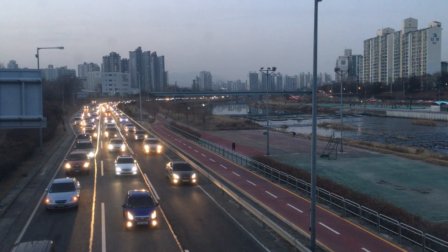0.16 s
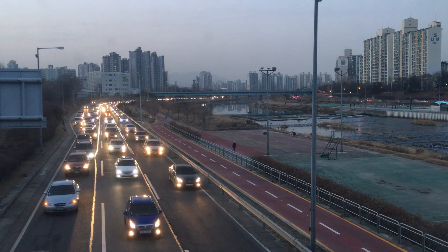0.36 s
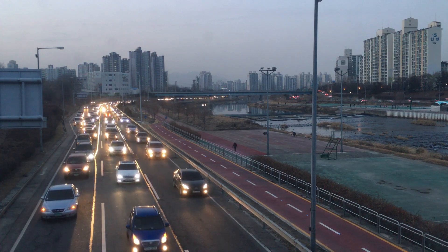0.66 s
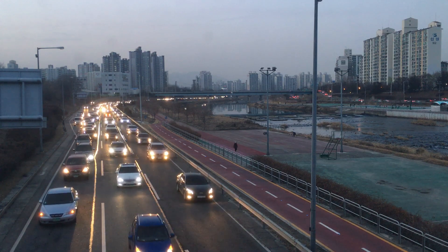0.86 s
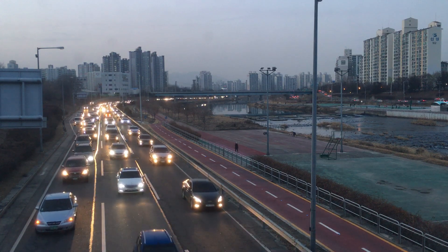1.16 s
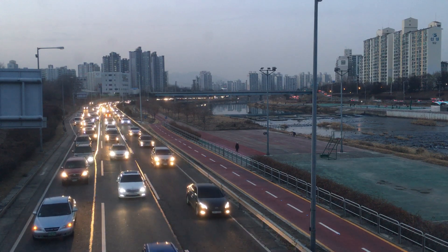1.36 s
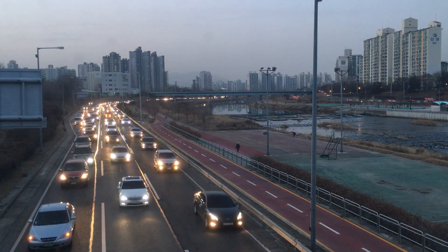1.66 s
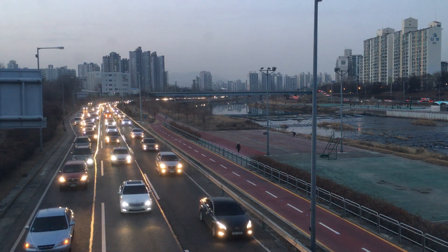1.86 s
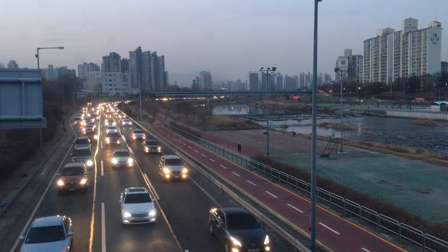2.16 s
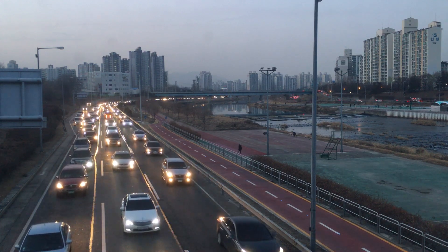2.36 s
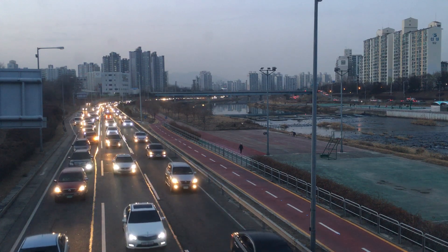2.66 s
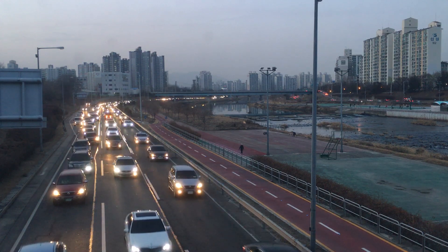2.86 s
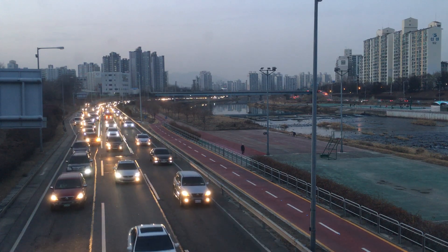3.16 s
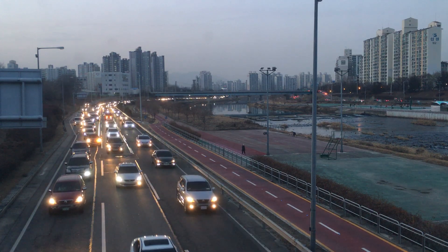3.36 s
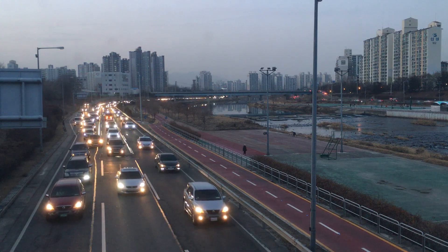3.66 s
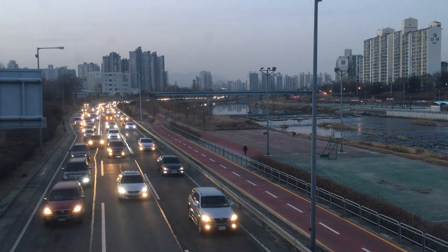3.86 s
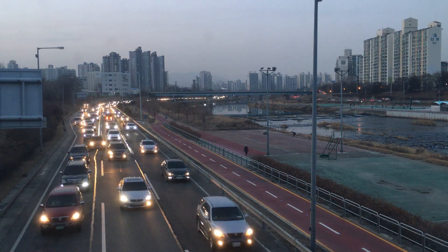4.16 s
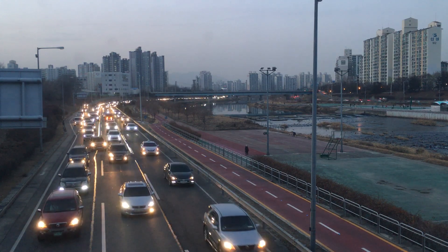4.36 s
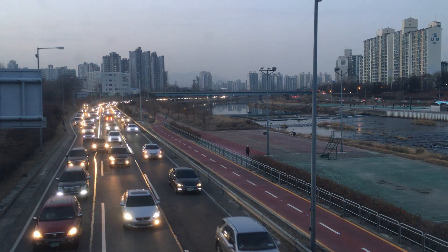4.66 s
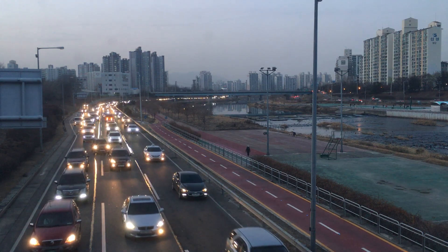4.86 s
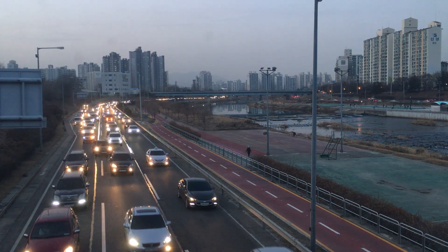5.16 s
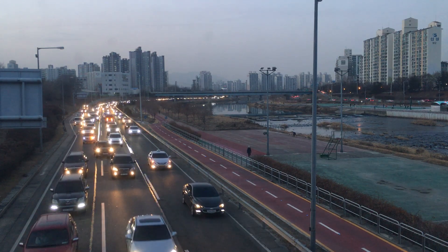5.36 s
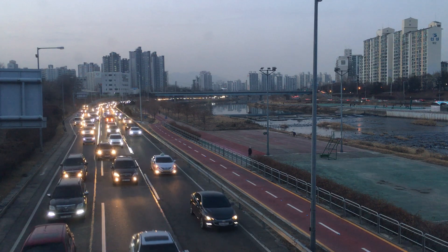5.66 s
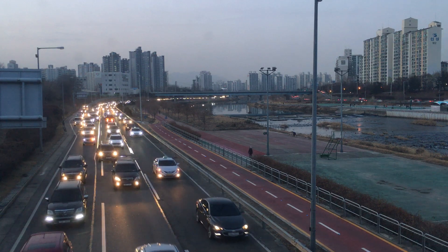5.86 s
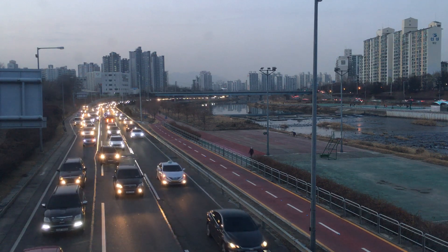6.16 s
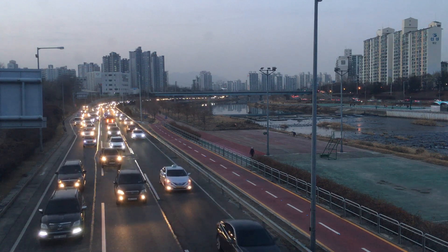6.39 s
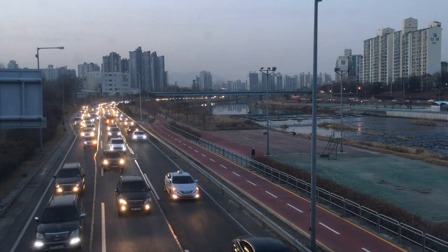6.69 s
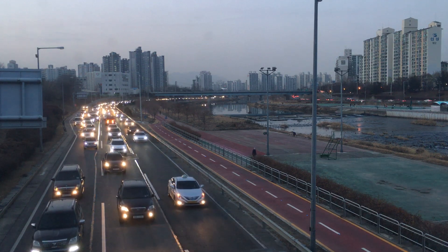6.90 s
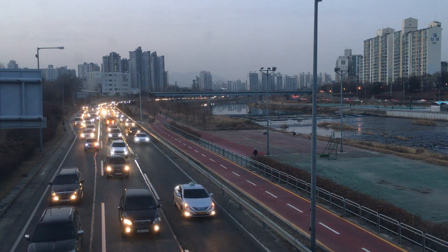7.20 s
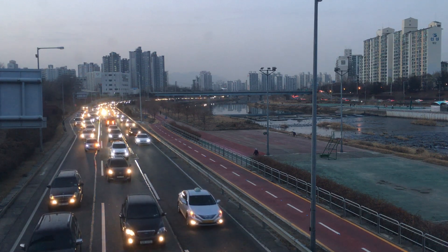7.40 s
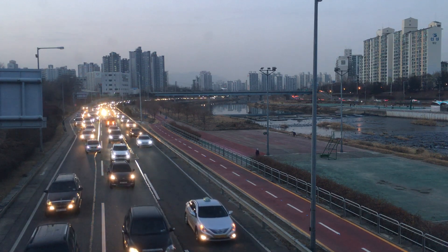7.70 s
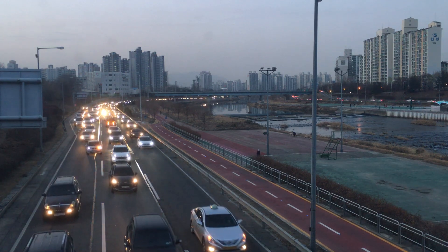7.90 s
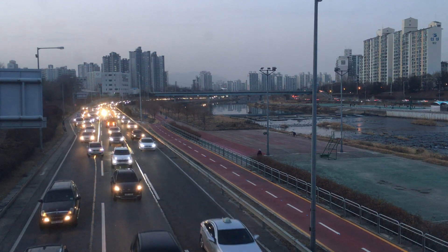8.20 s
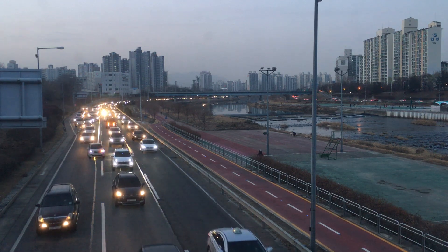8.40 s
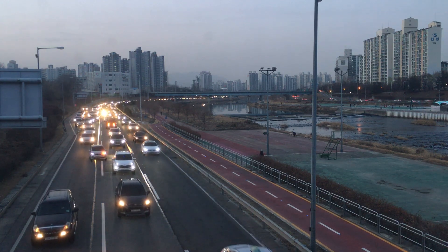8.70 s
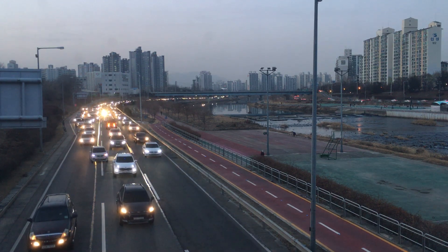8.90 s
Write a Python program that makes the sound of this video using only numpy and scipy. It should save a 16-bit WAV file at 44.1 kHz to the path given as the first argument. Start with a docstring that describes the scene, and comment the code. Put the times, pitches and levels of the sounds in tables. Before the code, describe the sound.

From 0 to about 9 seconds, dense slow traffic passes under a footbridge, heard by a small microphone above the road. A continuous deep exhaust rumble dominates, heaviest below about 120 Hz, under a softer, slightly patchy tyre roar around 1 kHz. Thin tyre hiss swells with the nearest cars and falls quickly as the deck hides them, near 0.5, 2.4, 4.5, 5.2, 5.9, 7.5 and 8.5 seconds, with another approaching at the end. Low engine tones, roughly 40 to 140 Hz, glide slightly and melt back into the rumble; a wavering hum is most noticeable around 4.5 to 5.5, and further low drones emerge from 6.5 onward. Very faint, narrow, breathy brake whistles appear around 1.7 to 2.6, 6.8 to 7.5, and 7.8 to 9.

```python
"""Dense, slow car traffic under a footbridge on a multi-lane road, heard by a small microphone:
exhausts and tyres of many cars blend into a low rumble and a roar around 1 kHz, both shaped noise.
The nearest cars add a bright hiss, noise that grows with approach until the bridge deck hides it.
Engine firing tones, gliding sines, surface and sink in the rumble.
Brakes whistle faintly as narrow bands of noise."""
import sys
import numpy as np
from scipy import signal
from scipy.fft import rfft, irfft, next_fast_len
from scipy.io import wavfile
from scipy.ndimage import uniform_filter1d

SR = 44100
rng = np.random.default_rng(int(sys.argv[2]) if len(sys.argv) > 2 else 0)


def generate_wav(signal):
    """Clip the signal to [-1, 1] and save it as 16-bit WAV at the path in sys.argv[1]."""
    frames = np.transpose(np.atleast_2d(signal))
    scaled = np.clip(frames, -1, 1) * 32767
    pcm = np.round(scaled).astype(np.int16)
    wavfile.write(sys.argv[1], SR, pcm)


N = 398663

# The stream of cars: (time [s], exhaust rumble [dB], tyre roar [dB], distant hiss brightness [dB])
STREAM_LEVELS = [(0.0, -34, -42.5, -2), (0.4, -35.5, -40.5, 1.5), (1.0, -33.5, -40.5, 1.5),
                 (1.6, -35.5, -40.5, -0.5), (2.3, -33, -40, 2), (2.8, -35.5, -39.5, -2),
                 (3.3, -32.5, -40, -6), (4.0, -32.5, -39.5, -2.5), (5.0, -32.5, -40, 0), (5.7, -32, -39, 3),
                 (6.5, -33.5, -38.5, 1), (7.3, -31.5, -39, -3), (8.0, -33.5, -39.5, -3),
                 (9.04, -34, -39.5, -1.2)]
# Exhaust noise spectrum: (frequency [Hz], relative density [dB per Hz])
RUMBLE_SPECTRUM = [(12, -30), (22, -19), (30, -3), (40, -0.5), (60, 1.5), (112, -5), (176, -5.5),
                   (290, -11.5), (370, -16.5), (500, -22.5), (780, -29.5), (1300, -78)]
# Where many engines and the hollow under the bridge pile up or thin out:
# (centre [Hz], width [Hz], lift [dB])
BOOM_MODES = [(45, 9.3, 1.5), (56, 10, 2), (71, 7.2, 0), (82.7, 15, 3), (100, 15.3, 7.5),
              (136.5, 12.4, 4.5), (234.8, 15.7, 4), (257, 17.5, -4), (284.2, 19, 4), (439, 10, 5.5)]
# Tyre roar spectrum: (frequency [Hz], relative density [dB per Hz])
ROAR_SPECTRUM = [(150, -62), (250, -8.5), (287, -11), (351, -11.5), (511, -10), (956, -4.5), (1790, -16.5),
                 (2570, -20), (3700, -32), (5000, -37), (6500, -50), (11000, -120)]
# Air pumped in tread grooves: (centre [Hz], width [Hz], lift [dB])
TREAD_MODES = [(943, 110, 1), (1320, 59, 1), (2520, 220, 1), (3200, 350, 2)]
# Tyre hiss spectrum: (frequency [Hz], relative density [dB per Hz])
HISS_SPECTRUM = [(1500, -28), (2500, -5.5), (4000, -1.5), (7000, -1.5), (10000, -6), (13000, -8),
                 (14400, -8.5)]
# The nearest cars: (time of going under the bridge [s], unshadowed hiss [dB], brightness [dB])
NEAR_CARS = [(0.55, -63, -2), (2.38, -61, 0), (4.5, -60, 1.3), (5.2, -57.5, -1.5), (5.9, -58.5, 4),
             (7.48, -59, 1.7), (8.45, -66, -1.5), (9.2, -60, 3.5)]
# One engine note that swells and sinks: (time [s], frequency [Hz], level [dB])
HUM_NOTE = [(0.25, 58.1, -39), (0.5, 60.4, -37), (0.8, 55.2, -38), (1.1, 56, -34), (1.5, 60.3, -35.5),
            (1.75, 58.8, -39), (2.2, 56, -39), (2.6, 55.2, -44), (2.9, 57.5, -34.5), (3.2, 57.5, -41),
            (3.7, 58.3, -36.5), (4.1, 60.05, -41), (4.45, 61.9, -28), (4.75, 57.9, -39), (5.0, 57.9, -31),
            (5.35, 60.5, -31), (5.65, 63, -33.5), (5.9, 63, -41)]
# The loudest engine firing tones:
# (start [s], length [s], first frequency [Hz], last frequency [Hz], peak level [dB])
LOUD_TONES = [(0.0, 0.4, 45.3, 45.2, -34), (0.147, 0.39, 102.5, 103, -37), (0.4, 0.49, 138.9, 141.2, -39.5),
              (1.609, 0.41, 51.44, 48.5, -32.5), (1.9, 0.83, 103, 105.4, -40),
              (2.369, 0.35, 45.5, 45.2, -36), (3.742, 0.51, 97.1, 99.4, -37),
              (4.172, 0.98, 101.6, 105.3, -37), (4.338, 0.56, 54.4, 51.8, -37),
              (4.949, 0.42, 51.5, 47.2, -33), (5.004, 0.43, 99.3, 96.3, -41), (5.607, 0.47, 81, 81.8, -35),
              (5.89, 0.74, 48.24, 45.3, -33), (6.449, 0.68, 102.6, 98.8, -32),
              (6.485, 0.53, 43.2, 47.5, -32.5), (6.55, 0.54, 95.5, 90.3, -37),
              (7.15, 0.27, 100.5, 103.2, -37), (7.4, 0.48, 45.5, 42.6, -32),
              (8.029, 0.95, 100.7, 101.1, -38.5), (8.258, 0.61, 42.2, 39, -33),
              (8.359, 0.78, 53.7, 58.5, -33.5), (8.608, 1, 66.7, 66.5, -33.5)]
# Narrow whistles, likely brakes rubbing:
# (start [s], length [s], centre [Hz], width [Hz], peak level [dB])
BRAKE_RUBS = [(1.7, .75, 6600, 330, -75), (1.8, 0.8, 2650, 170, -62), (1.9, 0.67, 8500, 400, -76),
              (6.8, .6, 5800, 400, -67), (6.9, .6, 15000, 800, -75), (7.82, 0.83, 6800, 500, -64),
              (8.598, .7, 15000, 800, -71)]
# Microphone port response: (centre [Hz], width [Hz], lift [dB])
PORT_MODES = [(7650, 1030, -4), (8600, 580, 2), (10400, 480, -3.5), (12700, 1300, 2)]

HEIGHT_M, SPEED_M_S, FAR_HISS_DB = 6.6, 10.6, -63
SHADOW_S, TREBLE_SHADOW_S = 0.16, 0.09  # the deck's edge cuts treble more sharply
# Roar treble with no car near, and its gain for each dB that near cars add
ROAR_DULL_DB, ROAR_LIFT = -4, 0.69
# Fainter firing tones at random times; the glide is the largest change as a share of the pitch
FAINT_COUNT, FAINT_S, FAINT_DB = 10, 0.53, -41.5
FAINT_LOW_HZ, FAINT_HIGH_HZ, FAINT_GLIDE = 44.96, 130.6, 0.028
WAVER_HZ, SECOND_HARMONIC_DB = 0.62, -20  # rms pitch shake; second harmonic against the first
EDGE_HZ = 15740  # upper band limit


def gain_of(db):
    """Logarithmic level: decibels become an amplitude ratio."""
    return 10 ** (np.asarray(db) / 20)


def evened(x):
    """Normalisation: the signal is scaled to rms 1."""
    return x / np.sqrt(np.mean(x ** 2) + 1e-20)


def drift(count, size):
    """Low-pass smoothing: two running means turn white noise into a slow drift of rms 1."""
    once = uniform_filter1d(rng.standard_normal(count), size=size)
    return evened(uniform_filter1d(once, size=size))


def columns(rows):
    """Linear interpolation: each column of a time curve is read at every sample."""
    time_s, *values = np.transpose(rows)
    t = np.arange(N) / SR
    return [np.interp(t, time_s, value) for value in values]


def read(points, hz):
    """Spectral envelope: points are joined on a log-frequency axis."""
    f, db = np.transpose(points)
    return np.interp(np.log(hz + 1), np.log(f + 1), db)


def humps(modes, hz):
    """Spectral peaks and dips: bell-shaped curves add in dB."""
    return sum(db * np.exp(-2 * ((hz - f) / width) ** 2) for f, width, db in modes)


def coloured(x, shape_db):
    """Linear filtering: the spectrum is multiplied by a gain that depends on frequency."""
    size = next_fast_len(N)
    hz = np.fft.rfftfreq(size, 1 / SR)
    return irfft(rfft(x, size) * gain_of(shape_db(hz)), size)[:N]


def tilted(x, bright_db, pivot_hz):
    """Treble loss with distance: what lies above the pivot changes, as nearer cars lose less."""
    top = coloured(x, lambda hz: -10 * np.log10(1 + (pivot_hz / (hz + 1)) ** 4))
    return x + (gain_of(bright_db) - 1) * top


def patchy_noise(patchy_db, gust_db):
    """Modulated noise: level drifts in time-frequency patches, and briefly across all bands."""
    frames = N // 128 + 5
    real, imaginary, patches = rng.standard_normal((frames, 257, 3)).T
    across_bands = uniform_filter1d(patches, size=5, axis=0)
    patches = evened(uniform_filter1d(across_bands, size=70, axis=1))
    gusts = drift(frames, 14)
    spectrum = (real + 1j * imaginary) * gain_of(patchy_db * patches + gust_db * gusts)
    return signal.istft(spectrum, nperseg=512, noverlap=384)[1][:N]


def near_power(shadow_s):
    """Inverse-square law: each near car's power over the distant hiss, until the deck hides it."""
    pass_s, hiss_db, _ = np.transpose(NEAR_CARS)[:, :, None]
    t = np.arange(N) / SR - pass_s
    spreading = 1 / (1 + (SPEED_M_S * t / HEIGHT_M) ** 2)
    in_view = 0.5 - 0.5 * np.tanh(t / shadow_s)
    return gain_of(2 * (hiss_db - FAR_HISS_DB)) * spreading * in_view


def exhaust_rumble():
    """Incoherent superposition: exhausts of many cars blend into one low noise."""
    level_db, _, _ = columns(STREAM_LEVELS)
    noise = patchy_noise(0.12, 0.15)
    rumble = coloured(noise, lambda hz: read(RUMBLE_SPECTRUM, hz) + humps(BOOM_MODES, hz))
    return gain_of(level_db) * evened(rumble)


def tyre_roar():
    """Incoherent superposition: tyre treads of many cars roar, brighter as cars come near."""
    _, level_db, _ = columns(STREAM_LEVELS)
    noise = patchy_noise(0.71, 0.23)
    roar = coloured(noise, lambda hz: read(ROAR_SPECTRUM, hz) + humps(TREAD_MODES, hz))
    near_db = 10 * np.log10(1 + near_power(SHADOW_S).sum(axis=0))
    return gain_of(level_db) * tilted(evened(roar), ROAR_DULL_DB + ROAR_LIFT * near_db, 2200)


def tyre_hiss():
    """Addition of powers: the thin hiss of near cars joins that of distant ones."""
    body = 1 + near_power(SHADOW_S).sum(axis=0)
    far_treble = gain_of(2 * columns(STREAM_LEVELS)[2])
    near_treble = gain_of(2 * np.transpose(NEAR_CARS)[2]) @ near_power(TREBLE_SHADOW_S)
    bright_db = 10 * np.log10((far_treble + near_treble) / body)
    hiss = coloured(patchy_noise(1.0, 0.23), lambda hz: read(HISS_SPECTRUM, hz))
    return gain_of(FAR_HISS_DB) * np.sqrt(body) * tilted(evened(hiss), bright_db, 8700)


def firing_tones(shake_hz):
    """Periodic combustion: each tone and its second harmonic glide, swell and fade."""
    out = np.zeros(N)
    when, pitch, glide = rng.random((FAINT_COUNT, 3)).T
    first = FAINT_LOW_HZ * (FAINT_HIGH_HZ / FAINT_LOW_HZ) ** pitch
    last = first * (1 + FAINT_GLIDE * (2 * glide - 1))
    faint = [(s, FAINT_S, f, g, FAINT_DB) for s, f, g in zip(when * N / SR, first, last)]
    tones = faint + LOUD_TONES
    for (start_s, length_s, first_hz, last_hz, level_db), cycle in zip(tones, rng.random(len(tones))):
        at = np.arange(max(round(start_s * SR), 0), min(round((start_s + length_s) * SR), N))
        way = (at / SR - start_s) / length_s  # 0 to 1 through the tone
        hz = first_hz + (last_hz - first_hz) * way + shake_hz[at]
        phase = 2 * np.pi * (np.cumsum(hz) / SR + cycle)
        tone = np.sin(phase) + gain_of(SECOND_HARMONIC_DB) * np.sin(2 * phase)
        out[at] += np.sqrt(2) * gain_of(level_db) * tone * np.sin(np.pi * way)
    return out


def engine_hum(shake_hz):
    """Frequency modulation: one engine note follows its pitch curve, swelling and sinking."""
    hum_hz, level_db = columns(HUM_NOTE)
    t = np.arange(N) / SR
    # Fades of 0.14 s at both ends
    heard = np.clip(np.minimum(t - HUM_NOTE[0][0], HUM_NOTE[-1][0] - t) / 0.14, 0, 1)
    phase = 2 * np.pi * np.cumsum(hum_hz + shake_hz) / SR
    return np.sqrt(2) * gain_of(level_db) * heard * np.sin(phase)


def engines():
    """Uneven combustion: one slow random shake of pitch is shared by every engine tone."""
    shake_hz = WAVER_HZ * drift(N, 3000)
    return firing_tones(shake_hz) + engine_hum(shake_hz)


def brakes():
    """Friction noise: each rub is a narrow band that swells and fades."""
    out, t = np.zeros(N), np.arange(N) / SR
    for start_s, length_s, centre_hz, width_hz, level_db in BRAKE_RUBS:
        noise = rng.standard_normal(N)
        whistle = coloured(noise, lambda hz: -np.minimum(12 * ((hz - centre_hz) / width_hz) ** 2, 80))
        swell = np.sin(np.pi * np.clip((t - start_s) / length_s, 0, 1))
        out += gain_of(level_db) * evened(whistle) * swell
    return out


def scene():
    """Linear superposition: all sources add at one microphone."""
    return (engines() + exhaust_rumble() + tyre_roar() + tyre_hiss() + brakes())[None]


def record(dry):
    """Transducer response: the deepest bass drops, the port colours treble, the band ends."""
    ported = coloured(dry[0], lambda hz: humps(PORT_MODES, hz) - 10 * np.log10(1 + (34 / (hz + 1)) ** 12))
    band_limit = signal.firwin(2047, EDGE_HZ, window=("kaiser", 9), fs=SR)
    return signal.oaconvolve(ported[None], band_limit[None], "same")


dry = scene()
out = record(dry)
generate_wav(out)
```